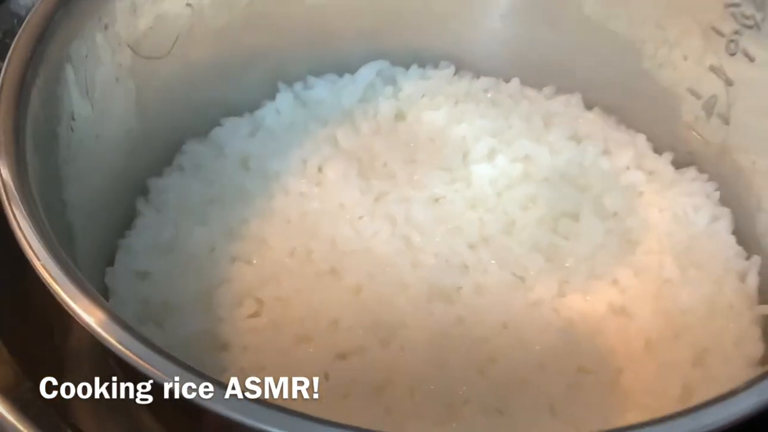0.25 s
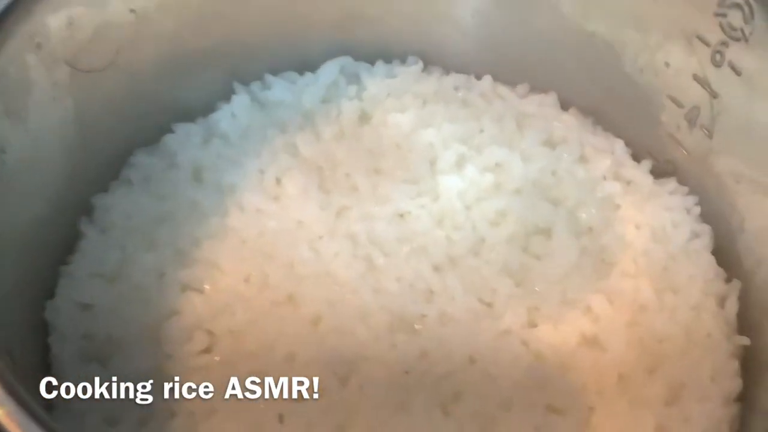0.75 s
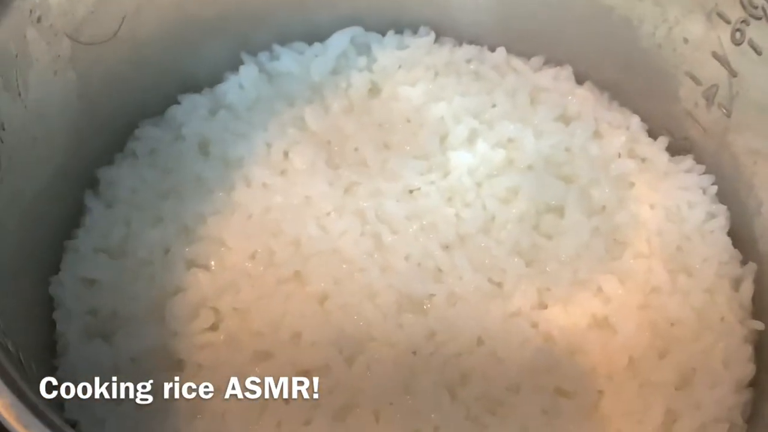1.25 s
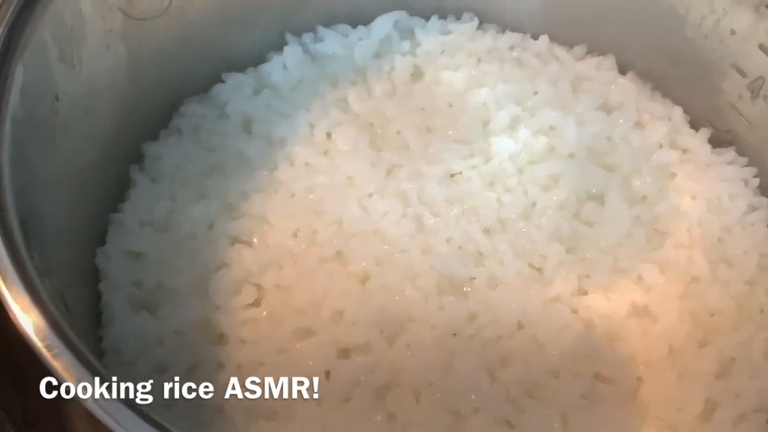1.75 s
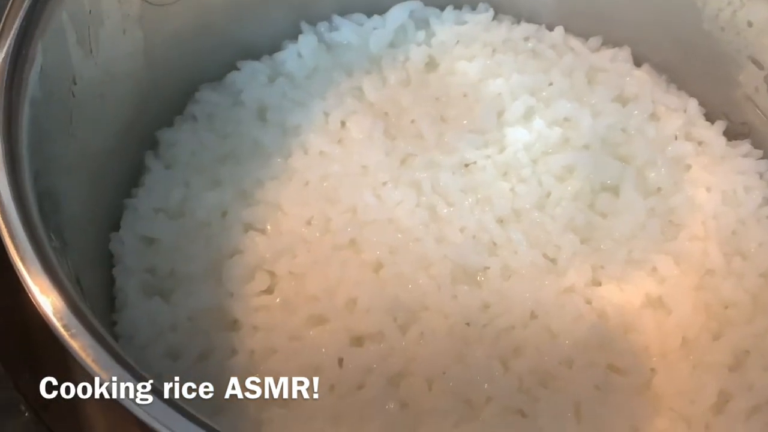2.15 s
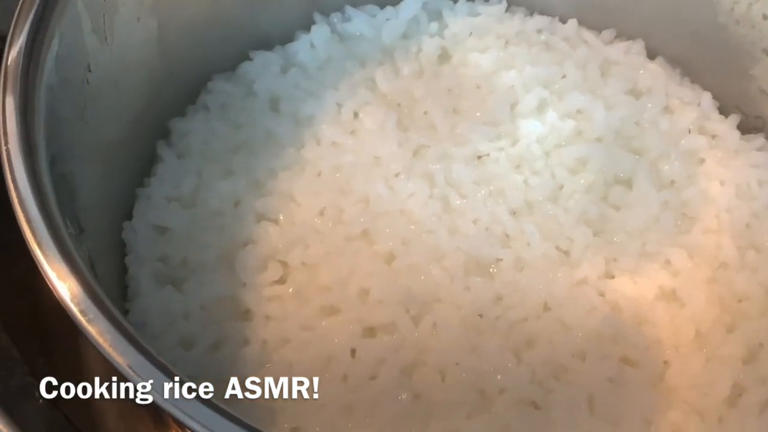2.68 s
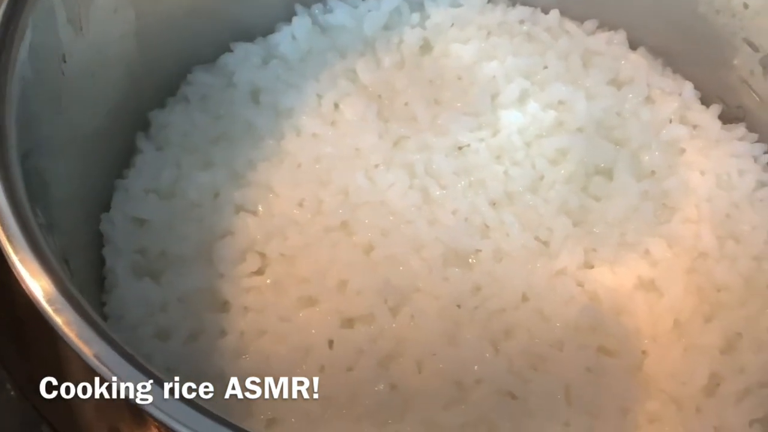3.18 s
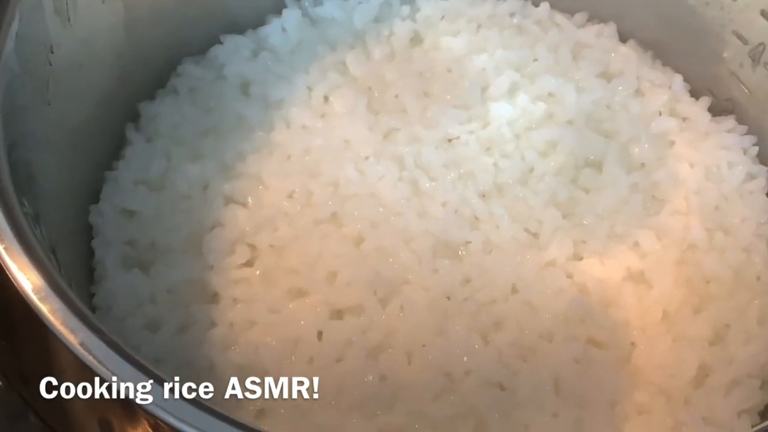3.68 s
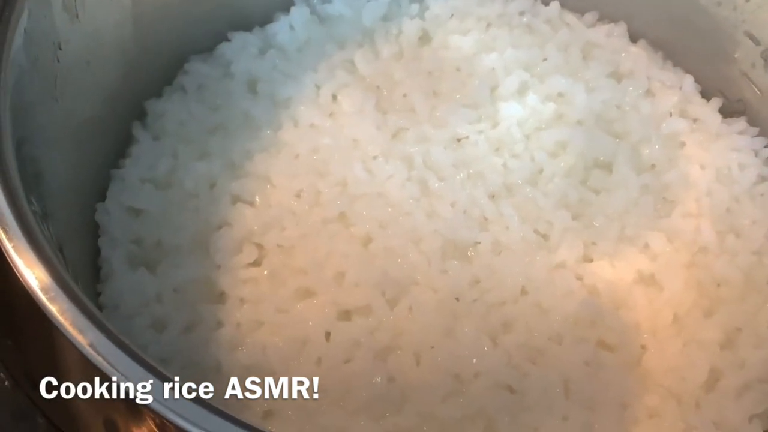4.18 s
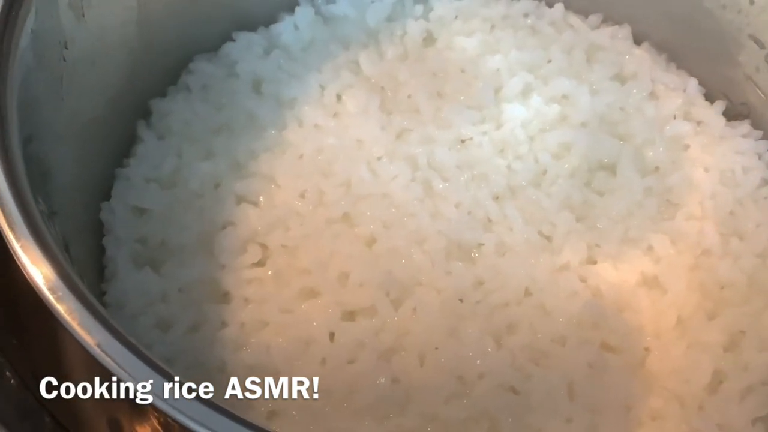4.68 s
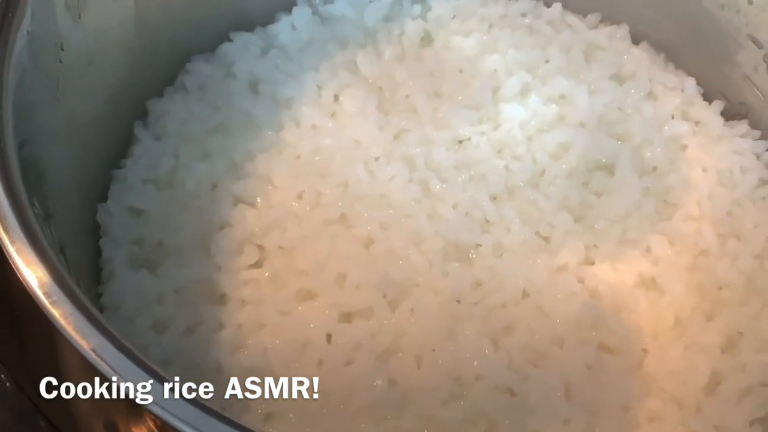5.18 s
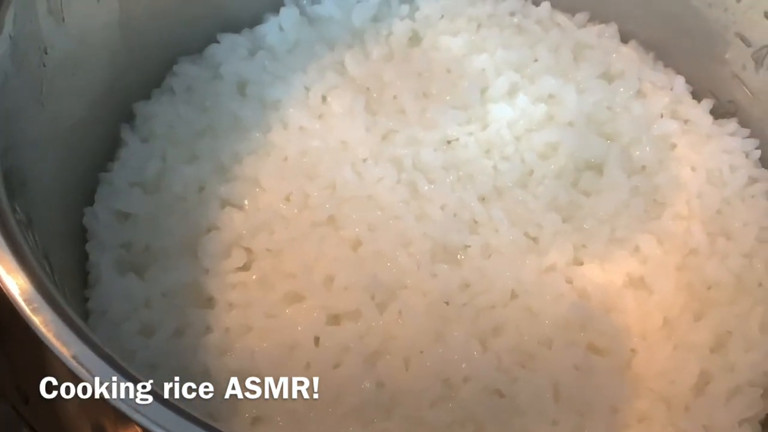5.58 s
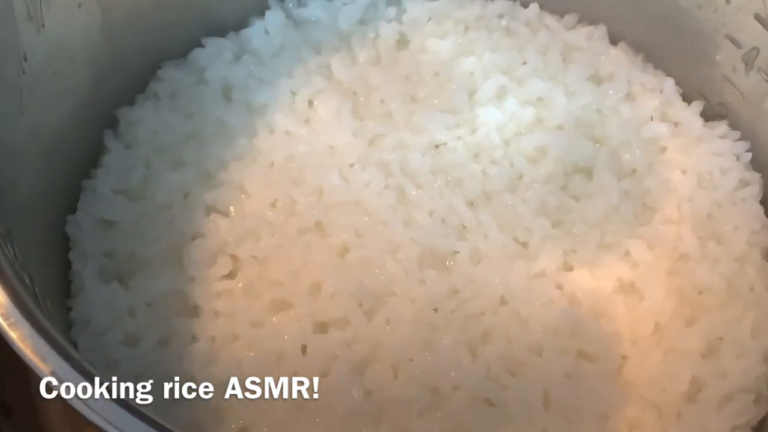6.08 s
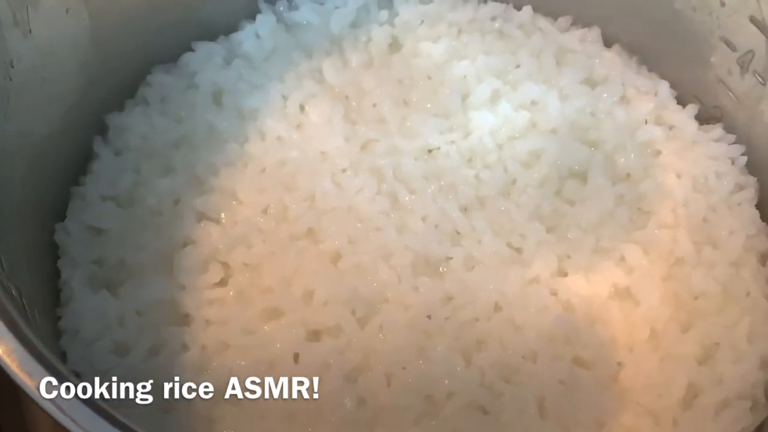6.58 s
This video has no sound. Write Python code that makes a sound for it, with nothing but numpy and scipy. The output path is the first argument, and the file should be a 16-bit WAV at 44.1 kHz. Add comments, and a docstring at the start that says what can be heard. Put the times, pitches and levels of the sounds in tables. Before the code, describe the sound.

Close to an open steel pot in a quiet kitchen, cooking rice fizzes finely with a hollow ring. After a hard knock, a few low bubbles plop, then bright sizzling steam bursts out suddenly. Bumps and two short metallic rim clinks cut through it as it turns coarser and dies away, leaving scattered ticks, a brief dry rub and faint room hum.

```python
"""In a quiet kitchen, rice steams in an open steel pot, close to a one-channel microphone.
A fine simmer, made of tiny random clicks, rings the air in the pot.
A brighter sizzle of clicks and noise breaks out, mellows and dies to single ticks, filtered noise bursts.
Handling bumps, knocks and a late dry rub are shaped noise; two clinks of the steel rim sum dying tones.
A few thick bubbles plop as low rising tones, over soft room noise and a faint mains hum."""
import sys
import numpy as np
from scipy import signal
from scipy.fft import rfft, irfft, next_fast_len
from scipy.io import wavfile
from scipy.ndimage import map_coordinates

SR = 44100
rng = np.random.default_rng(int(sys.argv[2]) if len(sys.argv) > 2 else 0)


def materialize(psi):
    """Save the field psi as 16-bit PCM at rate SR to the path in sys.argv[1].

    A 1-D psi becomes a single channel; in a 2-D psi each row is a channel.
    """
    bounded = np.clip(np.atleast_2d(psi).T, -1, 1)
    quanta = np.round(bounded * 32767).astype(np.int16)
    wavfile.write(sys.argv[1], SR, quanta)


N = 302085
TIME = np.arange(N) / SR  # time of every sample (s)

# air resonances of the pot: (frequency [Hz], width [Hz], relative level [dB])
POT_AIR = [(1186, 81, 1), (1687, 67, -2.5), (2273, 63, .5), (2851, 104, -2), (3520, 180, -9)]
# spectrum of ticks, scrapes and the rub: (frequency [Hz], relative level per Hz [dB])
TICK = [(500, -25.5), (1200, 6), (2500, -10), (3700, -5.5), (4600, -2.5), (7000, -10.5), (9500, -3.5),
        (11800, -3), (13500, -7), (15800, -7)]


def simmer(sparse_db=-66):
    """Countless small bubbles fizz under the rice and ring the air in the pot."""
    # simmer strength, steady and then dying away: (time [s], relative level [dB])
    simmer_levels = [(0.0, -50.5), (1.6, -52), (2.9, -51.5), (3.7, -56.5), (4.1, -54.5), (4.85, -56),
                     (5.3, -58), (5.74, -78), (6.85, -84)]
    # spectrum of the fizz: (frequency [Hz], relative level per Hz [dB])
    fizz_spectrum = [(300, -22), (600, -5), (900, -14), (1300, -6), (2600, -10.5), (3800, -8), (5000, -0.5),
                     (6080, 0.3), (6220, -9), (9700, -2.7), (11000, -5), (12300, -12.5), (15800, -13.5)]
    level_db = curve(simmer_levels) + choke()

    # as the simmer dies, the dense fizz thins to separate grains
    sparse_share = 1 / (1 + amp(2 * (level_db - sparse_db)))
    dense = np.sqrt(1 - sparse_share) * grains(rate=14000, spread_db=3.5)
    sparse = np.sqrt(sparse_share) * grains(rate=1100, spread_db=3.5)
    fizz = coloured(dense + sparse, fizz_spectrum) * amp(6.5 + 1.3 * wobble(12))

    ring = resonant(grains(rate=6000, spread_db=3.0), POT_AIR) * amp(-1.57 + 0.53 * wobble(3.4))
    return amp(level_db) * (off_walls(fizz, echo_db=-11) + ring)


def steam():
    """Water flashes on hot steel: a fine bright spray, then a coarser froth as it dries."""
    # strength of the sizzling steam: (time [s], relative level [dB])
    steam_levels = [(2.1, -38), (2.65, -41), (2.87, -38), (3.22, -41.5), (3.44, -37.5), (3.77, -45),
                    (3.95, -43), (4.55, -47), (5.05, -50), (5.45, -54)]
    # drops flash on the steel and swell the steam: (time [s], swell [dB], half length [s])
    spits = [(2.12, 5, 0.011), (2.344, 1.5, 0.055), (3.14, 1, 0.015), (3.37, 1.5, 0.028), (4.411, 5, 0.017),
             (4.82, 3, .09), (5.064, 3, 0.017), (5.223, 8.5, 0.021), (5.593, 7, 0.052)]
    # spectra of spray, vapour jet and froth: (frequency [Hz], relative level per Hz [dB])
    spray_spectrum = [(1500, -33), (3500, -20.5), (5000, -11), (6900, -1), (8500, -8), (10200, -3.5),
                      (11600, 1), (12700, -2), (13800, -10.5), (15800, -19)]
    jet_spectrum = [(3000, -24), (5000, -7.5), (6700, 3.5), (8300, 2.5), (10000, -1), (12500, -27),
                    (15800, -18)]
    froth_spectrum = [(1500, -40.5), (2500, -13.5), (3100, -11.5), (3700, -6.5), (4400, -2), (5000, -2),
                      (5800, -11.5), (8000, -21), (15000, -31.5)]
    start, rise, stop, fade = 2.047, 0.0079, 5.605, 0.066  # onset, rise, end, fade time constant (s)
    spray_db, jet_db, ring_db = -2.5, -5, -14.0  # relative levels (dB)
    full_db, surge = -38, 0.85  # level of full boil (dB), extra jet dB per steam dB below it

    level_db = curve(steam_levels) + choke()
    level_db = level_db + sum(db * swell(s, half) for s, db, half in spits)
    # the froth starts weak on wet steel and swells as the steel dries
    froth_db = level_db - 14 + 16 * swell(middle=4.88, half=0.78)

    spray = coloured(grains(rate=14000, spread_db=7.0), spray_spectrum) * amp(level_db + spray_db)
    # the smooth rush of vapour grows faster than the spray, up to full boil
    surge_db = surge * np.minimum(level_db - full_db, 0)
    jet = coloured(rng.standard_normal(N), jet_spectrum) * amp(level_db + jet_db + surge_db)
    froth = coloured(grains(rate=7000, spread_db=9.0), froth_spectrum) * amp(froth_db + 0.8 * wobble(16))
    # the froth also rings the two lowest air resonances
    ring = resonant(grains(rate=4700, spread_db=2), POT_AIR[:2]) * amp(froth_db + ring_db)

    envelope = np.clip((TIME - start) / rise, 0, 1) * np.exp(-np.maximum(TIME - stop, 0) / fade)
    flutter = amp(1.0 * wobble(35))
    return envelope * (spray + jet + froth + ring) * flutter


def choke(middle=5.133, half=0.038, depth_db=-10.5):
    """The wet rice seals the steam in for a moment: the level dips, in dB."""
    return depth_db * swell(middle, half)


def pops(count=600, crackle_db=-65.0, spread_db=6.5, crackle_hz=6000, t60=0.0074, q=1.0):
    """Larger bubbles tick one by one over a faint crackle; each has the pitch of its size."""
    # the loudest bursts: (time [s], level before the tick filter [dB], pitch [Hz])
    loud_pops = [(5.661, -47, 5940), (5.720, -48, 4000), (5.896, -46.5, 6500), (5.929, -56, 8900),
                 (6.053, -49.5, 9400), (6.166, -44, 4580), (6.178, -52, 8960), (6.215, -50, 7440),
                 (6.501, -46, 12000), (6.542, -49, 7000), (6.556, -51, 8500), (6.703, -52, 2210)]
    faint_pops = []
    for _ in range(count):
        s = rng.random() * N / SR
        db = crackle_db + spread_db * np.clip(rng.standard_normal(), -2, 2)
        hz = crackle_hz * np.exp(0.5 * rng.standard_normal())
        faint_pops.append((s, db, hz))

    track = np.zeros(N)
    for s, db, hz in loud_pops + faint_pops:
        add(track, s, amp(db) * around(burst(t60)[:SR // 30], hz, q))
    return coloured(track, TICK)


def plops(t60=0.07, attack=0.0021, glide=0.61):
    """A thick bubble deep in the rice rings low and rises a little as it opens."""
    # (time [s], level before the envelope [dB], starting pitch [Hz])
    thick_bubbles = [(1.595, -41.5, 326), (1.675, -46, 318), (2.031, -40, 322), (2.11, -43, 313)]
    track, t = np.zeros(N), np.arange(SR // 5) / SR
    envelope = (1 - np.exp(-t / attack)) * decay(t, t60)
    for s, db, hz in thick_bubbles:
        add(track, s, amp(db) * envelope * np.sin(2 * np.pi * hz * t * (1 + glide * t)))
    return track


def knocks(soft_hz=1450, air_t60=0.11, scrape_q=1.3):
    """Bumps and knocks mix a body thud, a ring of the pot's air, a dry scrape and a low bump in the base."""
    # knocks on the pot; the first two rows are low handling bumps, nearly all bass;
    # levels are before filtering, and each layer below scales the decay:
    # (time [s], thud [dB], air ring [dB], scrape [dB], scrape centre [Hz], bass [dB], basic t60 [s])
    knock_list = [(0.12, -58, -65, -68, 4000, -49, 0.08), (0.154, -58, -68, -70, 4000, -46, 0.044),
                  (0.876, -41, -29.5, -33, 4200, -42, 0.039), (0.883, -27, -56, -24.5, 3930, -37, 0.042),
                  (3.452, -40, -43, -30, 6470, -60, 0.07), (3.460, -30.5, -44, -26.5, 6360, -62, 0.031),
                  (3.724, -29.5, -46.5, -70.5, 2500, -57, 0.1),
                  (3.897, -32.5, -54.5, -69, 2490, -67.5, 0.068),
                  (3.915, -31.5, -41, -32.5, 5600, -65, 0.17), (4.111, -30, -42, -33.5, 5500, -68, 0.079),
                  (5.8171, -47, -49, -36, 5000, -36, 0.052)]
    # hollow modes of the pot in its housing: (frequency [Hz], width [Hz], relative level [dB])
    body_modes = [(356, 27, -5), (503, 69, 1), (580, 31, -1), (716, 59, 5.5), (1014, 70, 0),
                  (1136, 100, -5), (1398, 170, -23.5), (1873, 9.1, 10.5)]
    thud, air, scrape, bass = np.zeros((4, N))
    for s, thud_db, air_db, scrape_db, scrape_hz, bass_db, t60 in knock_list:
        add(thud, s, amp(thud_db) * blow(0.95 * t60, direct=0.33))
        add(air, s, amp(air_db) * ringing(POT_AIR[0][0], air_t60))
        add(scrape, s, amp(scrape_db) * around(burst(0.82 * t60), scrape_hz, scrape_q))
        add(bass, s, amp(bass_db) * blow(0.93 * t60, direct=0.41))

    # the padded contact passes little treble to the body
    soften = signal.butter(4, soft_hz, fs=SR, output="sos")
    body = signal.sosfilt(soften, resonant(thud, body_modes))
    base_spectrum = [(25, -35.5), (50, -11.0), (90, -2.5), (160, -2), (300, -8), (420, -7.5), (3000, -49.5)]
    return body + air + coloured(scrape, TICK) + coloured(bass, base_spectrum)


def clinks(attack=0.0008, clatter_db=-13, clatter_t60=0.063, crash_db=-1, crash_t60=0.1):
    """The rim rings in modes set by where it is struck; the contact chatters briefly."""
    # (time [s], relative level [dB], place along the rim [0-1])
    strikes = [(3.9139, -27.5, 0.01), (4.1103, -26, 0.85)]
    # steel modes: (frequency [Hz], t60 [s], level at one end of the rim [dB], level at the other [dB])
    steel_modes = [(1100, 0.029, -2.5, -21), (1375, 0.029, 9, -6.5), (1540, 0.083, -0.5, -8),
                   (1610, 0.032, 7, -9.5), (1865, 0.1, 3, -11.5), (1950, 0.17, -7, -6),
                   (2050, 0.2, 2.5, -13), (2080, 0.12, 4, 2.5), (2123, 0.07, 2.5, 4),
                   (2242, 0.29, -27.5, -6.5), (2370, 0.15, -13, -18), (2598, 0.19, -6, -15),
                   (2720, 0.29, -6, -22.5), (2940, 0.15, -10, -29), (3380, 0.41, -17, -34),
                   (3557, 0.25, -22.5, -15.5), (4380, 0.052, -4, -14.5), (4620, 0.16, -8, -17),
                   (5383, 0.18, 0, -28), (5710, 0.16, -3, -15), (6010, 0.1, -10.5, -18.5),
                   (6310, 0.17, -12, -28), (6930, 0.18, -6.5, -18.5), (7028, 0.18, -11, -23),
                   (7300, 0.12, -17.5, -8)]
    # the crowd of weak, short-lived modes between the strong ones:
    # (frequency [Hz], relative level per Hz [dB])
    crash_spectrum = [(500, -24.5), (900, -16), (1400, 0), (2100, 2.5), (2500, -10), (3300, -21.5),
                      (4600, -15), (7200, -9), (8500, -24), (15000, -40.5)]
    crash_far_db = -8.5  # change in the crowd's level at the far end of the rim

    track, crash, t = np.zeros(N), np.zeros(N), np.arange(SR // 2) / SR
    for s, db, place in strikes:
        ring = np.zeros(len(t))
        for k, (hz, t60, near_db, far_db) in enumerate(steel_modes):
            mode_db = near_db + place * (far_db - near_db)
            ring += (-1) ** k * amp(mode_db) * ringing(hz, t60)  # modes alternate in sign
        chatter = burst(clatter_t60)
        rattle = signal.fftconvolve(ring, chatter / np.linalg.norm(chatter))[:len(t)]
        add(track, s, amp(db) * (ring + amp(clatter_db) * rattle) * (1 - np.exp(-t / attack)))
        add(crash, s + attack, amp(db + crash_db + place * crash_far_db) * burst(crash_t60))
    return track + coloured(crash, crash_spectrum)


def rub(start=6.315, attack=0.012, hold=0.026, t60=0.11, level_db=-50.5, rattle_db=-7):
    """A short dry rub or scrape near the end, with a grainy rattle."""
    t = TIME - start
    envelope = np.clip(t / attack, 0, 1) * decay(np.maximum(t - attack - hold, 0), t60)
    scrape = coloured(around(grains(rate=2200, spread_db=3.5), hz=5500, q=0.56), TICK)
    rattle_spectrum = [(300, -16), (800, -2), (1200, 7), (1700, -19), (3000, -8), (8000, -37)]
    rattle = coloured(grains(rate=2900, spread_db=10), rattle_spectrum)
    return amp(level_db) * envelope * (scrape + amp(rattle_db) * rattle)


def kitchen(room_db=-58):
    """Low room noise with a faint mains hum."""
    # spectrum of the room noise: (frequency [Hz], relative level per Hz [dB])
    rumble_spectrum = [(26, -40.5), (38, -19), (58, 5), (90, -2.5), (140, -3.5), (205, 1), (380, -5.5),
                       (520, -6), (750, -11), (900, -20), (1170, -16), (1400, -32), (4000, -35.5),
                       (15000, -47.5)]
    # mains hum: (frequency [Hz], rms level [dB])
    hum_tones = [(60, -72.5), (120, -69.5)]
    hum = np.zeros(N)
    for hz, db in hum_tones:
        # the phase drifts a little
        hum += amp(db) * np.sqrt(2) * np.sin(2 * np.pi * hz * TIME + 0.36 * wobble(2.9))
    rumble = coloured(rng.standard_normal(N), rumble_spectrum)
    return amp(room_db + 0.4 * wobble(3.5)) * rumble + hum


def walls(x, t60=0.27):
    """The short answer of the kitchen: a dying noise tail that starts 5 ms late."""
    tail = np.pad(burst(t60), (SR // 200, 0))
    return signal.fftconvolve(x, tail / np.linalg.norm(tail))[:N]


def off_walls(x, count=10, reach=0.012, echo_db=-9):
    """Quick reflections between the steel walls, within reach seconds, ripple the spectrum."""
    echoes = np.zeros(SR // 20)
    delays = np.maximum(reach * rng.random(count), 0.0004)
    signs = rng.choice([-1, 1], count)
    echoes[(SR * delays).astype(int)] = signs * amp(echo_db) / np.sqrt(count)
    echoes[0] = 1  # the direct sound
    return signal.fftconvolve(x, echoes / np.linalg.norm(echoes))[:N]


def grains(rate, spread_db):
    """Tiny clicks at random moments, about rate a second, of random sizes and signs, rms 1."""
    size = amp(spread_db * np.minimum(rng.standard_normal(N), 2))
    happens = rng.random(N) < rate / SR
    return unit(happens * size * rng.choice([-1, 1], N))


def burst(t60):
    """Noise that starts at rms 1 and falls by 60 dB in t60 seconds."""
    t = np.arange(SR // 3) / SR
    return rng.standard_normal(len(t)) * decay(t, t60)


def blow(t60, direct):
    """A sharp contact followed by dying chatter; direct is the contact's share of the energy."""
    force = burst(t60)
    contact = np.sqrt(direct) * np.linalg.norm(force)
    return np.r_[contact, np.sqrt(1 - direct) * force[1:]]


def ringing(hz, t60):
    """One dying mode: a sine that falls by 60 dB in t60 seconds."""
    t = np.arange(SR // 2) / SR
    return decay(t, t60) * np.sin(2 * np.pi * hz * t)


def resonant(x, modes):
    """x through (Hz, width Hz, dB) resonances, keeping the power of white noise."""
    def response(f):
        h = sum(amp(db) * 1j * f * w / (c * c - f * f + 1j * f * w) for c, w, db in modes)
        return h / np.sqrt(np.mean(abs(h) ** 2))
    return filtered(x, response)


def around(x, hz, q):
    """A broad resonance at hz that roughly keeps the power of white noise; higher q is narrower."""
    centre = np.clip(hz, 100, SR / 3)
    width = min(centre / q, SR / 3)
    b, a = signal.iirpeak(centre, centre / width, SR)
    return signal.lfilter(b, a, x) * np.sqrt(SR / np.pi / width)


def coloured(x, spectrum):
    """A causal filter through (Hz, dB) points that keeps the power of white noise."""
    def response(hz):
        f, db = np.transpose(spectrum)
        gain = unit(amp(np.interp(np.log(hz + 1), np.log(f), db)))
        # folding the cepstrum makes the filter minimum phase: nothing sounds early
        cepstrum = irfft(np.log(gain))
        half = len(cepstrum) // 2
        return np.exp(rfft(np.r_[cepstrum[0], 2 * cepstrum[1:half], np.zeros(half)]))
    return filtered(x, response)


def filtered(x, response):
    """x shaped by a complex response of frequency; padding leaves room for the tail."""
    m = 2 * next_fast_len(N // 2 + SR // 4)
    return irfft(rfft(x, m) * response(np.fft.rfftfreq(m, 1 / SR)), m)[:N]


def curve(rows):
    """One value per sample, on straight lines between (s, value) rows."""
    s, values = np.transpose(rows)
    return np.interp(TIME, s, values)


def wobble(rate):
    """A smooth random curve, rate knots a second."""
    knots = rng.standard_normal(int(N * rate / SR) + 4)
    return map_coordinates(knots, [TIME * rate])


def swell(middle, half):
    """A smooth bump of height 1; it falls to 1/e at half seconds from the middle."""
    return np.exp(-((TIME - middle) / half) ** 2)


def decay(t, t60):
    """A fall by 60 dB every t60 seconds."""
    return np.exp(-np.log(1000) * t / t60)


def add(track, s, sound):
    """Mix a sound into a track at time s."""
    part = track[round(s * SR):][:len(sound)]
    part += sound[:len(part)]


def amp(db):
    """Decibels to an amplitude factor."""
    return 10 ** (np.asarray(db) / 20)


def unit(x):
    """x scaled to rms 1."""
    return x / np.sqrt(np.mean(x ** 2) + 1e-20)


def scene():
    """Everything reaches one microphone, so both channels are alike."""
    hits = knocks() + clinks() + pops() + plops()
    dry_sources = simmer() + off_walls(steam()) + rub()
    mono = dry_sources + hits + amp(-12) * walls(hits) + kitchen()
    return np.array([mono, mono])


def record(dry, top_hz=15800):
    """The recorder keeps nothing above its band limit."""
    return np.array([filtered(channel, lambda hz: hz < top_hz) for channel in dry])


dry = scene()
out = record(dry)
materialize(out)
```